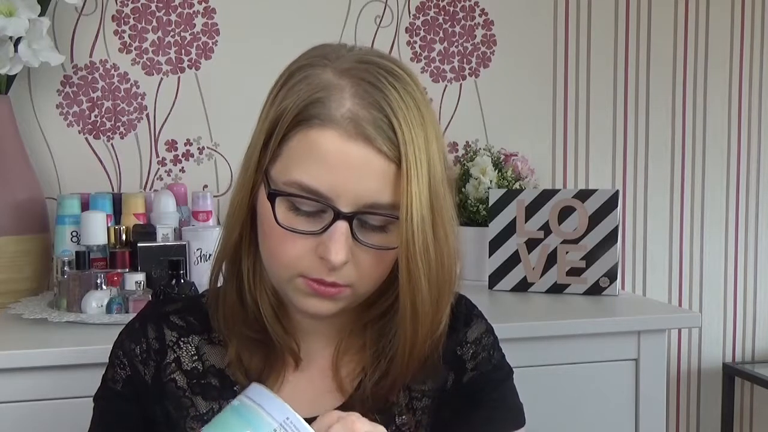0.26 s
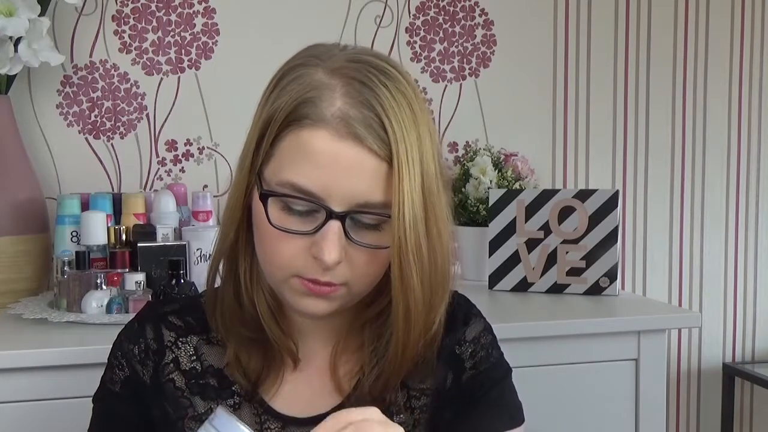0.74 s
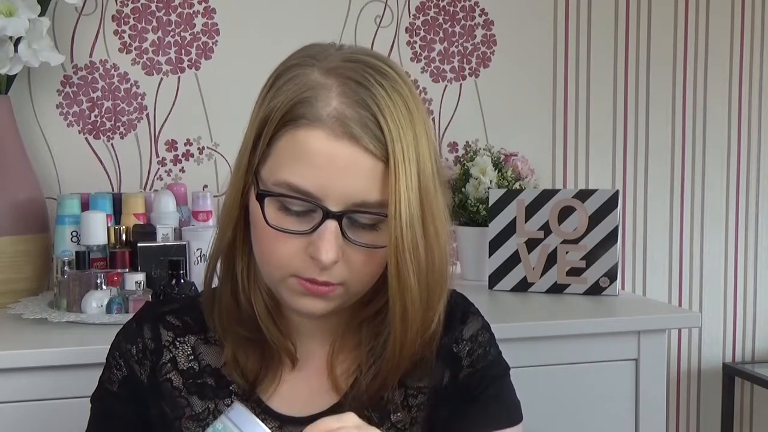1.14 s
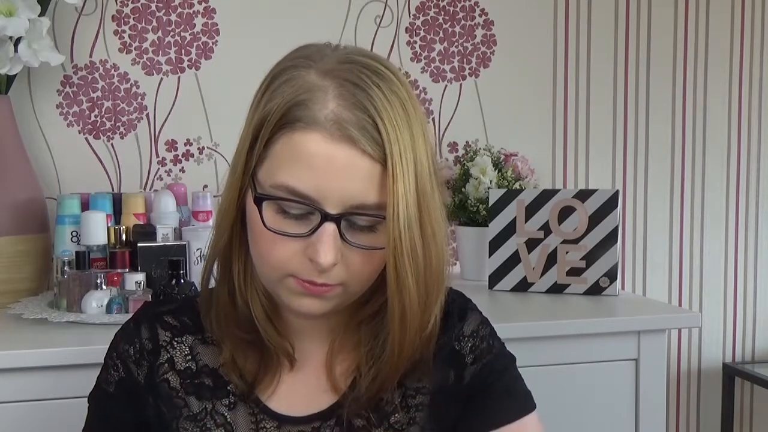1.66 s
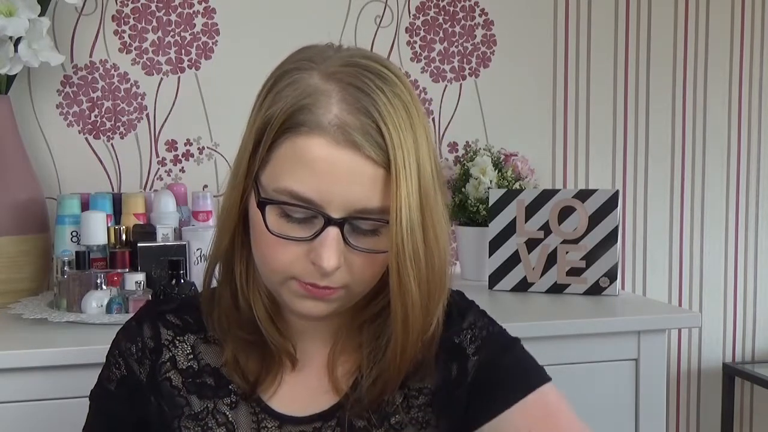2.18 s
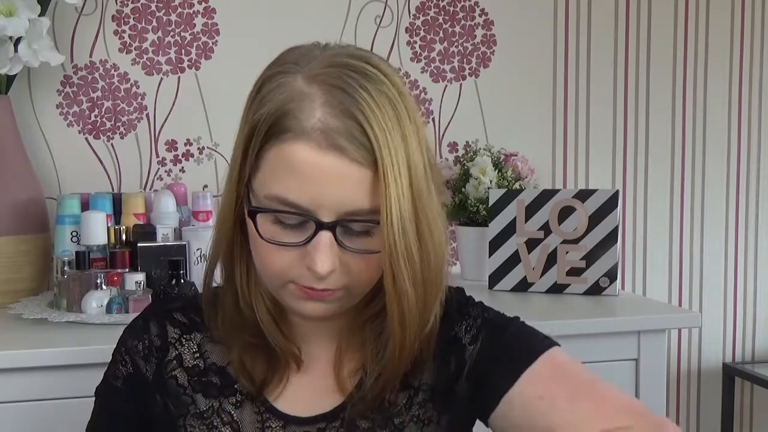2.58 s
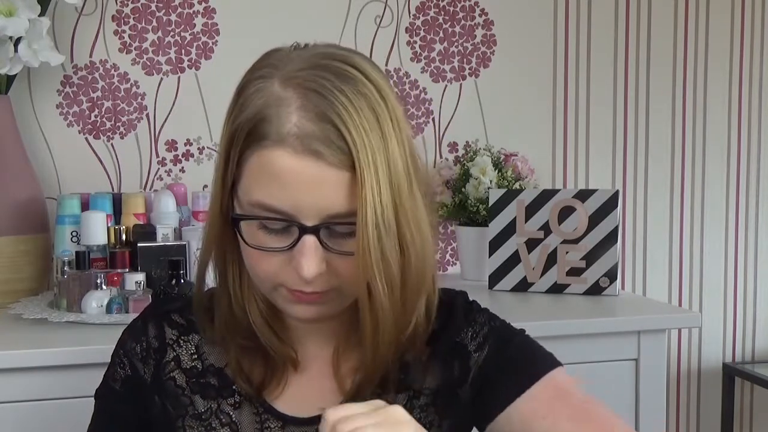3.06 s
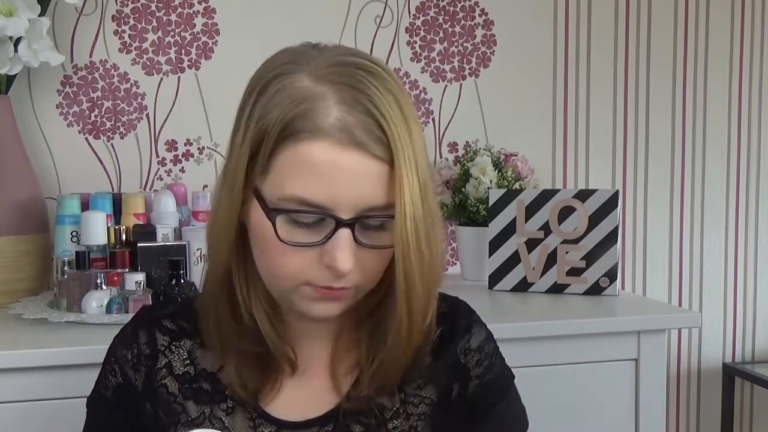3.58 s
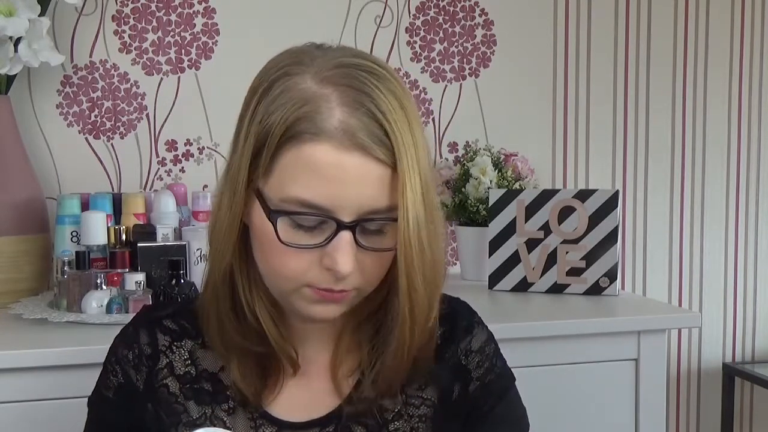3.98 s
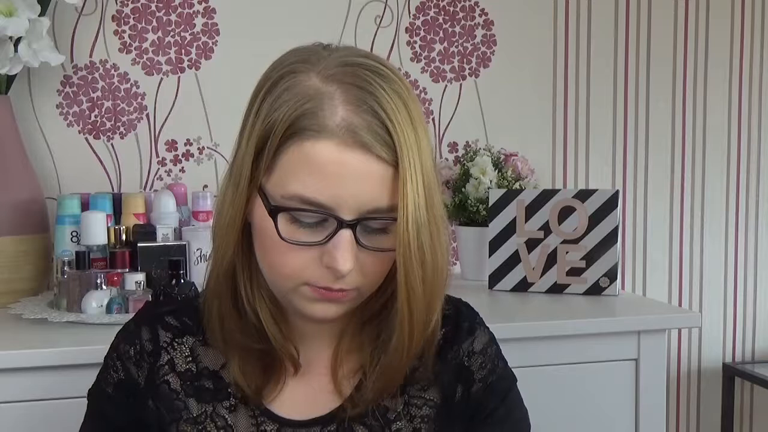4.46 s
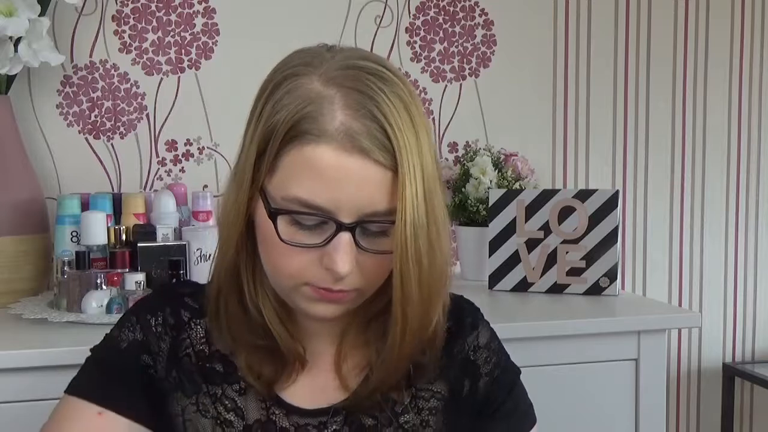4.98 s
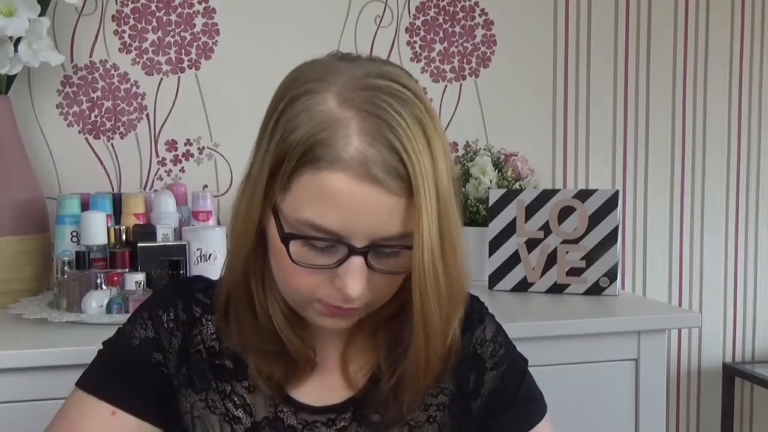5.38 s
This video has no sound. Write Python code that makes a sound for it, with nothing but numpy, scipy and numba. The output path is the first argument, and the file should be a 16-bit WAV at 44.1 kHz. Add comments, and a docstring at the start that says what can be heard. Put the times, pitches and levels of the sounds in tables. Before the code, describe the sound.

Someone opens a cardboard snack tube with a metal base, close by in a small, quiet room. The lid clicks and pops off hollowly, then handling gives several sharp knocks. The foil seal buckles with loud snaps and rips back in short, drumming pulls. A brief lull leads to lighter crinkling, fingers sliding over foil and cardboard, and a few more snaps and knocks, all with a short room reverberation.

```python
"""A snack can, a cardboard tube with a metal base, is opened close by in a small furnished room.
The lid comes off with a hollow pop; the foil seal buckles in sharp snaps and tears from the rim by
stick-slip, drumming like a membrane. Sliding fingers rustle and hiss on foil and cardboard, and knocks
set the lid or base ringing. The resonances of the tube colour the sound, and the room reverberates."""
import sys
import numpy as np
from scipy import signal
from scipy.fft import rfft, irfft, next_fast_len
from scipy.io import wavfile
from scipy.ndimage import uniform_filter1d
from numba import njit

SR = 44100
rng = np.random.default_rng(int(sys.argv[2]) if len(sys.argv) > 2 else 0)


def waveform_to_disk(signal):
    """Save audio, clipped to [-1, 1], as 16-bit WAV at the path in sys.argv[1]."""
    frames = np.transpose(np.atleast_2d(signal))
    scaled = np.clip(frames, -1, 1) * 32767
    samples = np.round(scaled).astype(np.int16)
    wavfile.write(sys.argv[1], SR, samples)


N = 248283
T = np.arange(N) / SR

# The dying tail of a knock at the very start, then finger strokes on foil and cardboard:
# start_s, length_s, rustle_db, hiss_db
RUSTLES = [(0, 0.0037, -28.5, -31), (0.047, 0.11, -68, -60), (0.3, 0.09, -56, -49), (0.525, 0.14, -52, -63),
           (1.036, 0.2, -69, -75), (1.6, 0.32, -56, -56.5), (1.905, 0.16, -58, -70),
           (2.327, 0.21, -57, -55), (2.578, 0.12, -44, -43.5), (2.87, 0.15, -46.5, -50.5),
           (3.257, 0.059, -80, -59), (3.355, 0.05, -67.5, -55), (4.224, 0.12, -70.5, -53),
           (4.318, 0.026, -53, -41.5), (4.336, 0.15, -60.5, -45), (4.478, 0.19, -65, -59.5),
           (4.813, 0.3, -49, -52.5), (5.151, 0.15, -65, -41.5), (5.301, 0.062, -70, -43),
           (5.395, 0.087, -58.5, -50.5), (5.507, 0.12, -54, -63)]
# Snaps of foil and rim: start_s, pitch_hz, note_db, crack_db, sizzle_db
FOIL_SNAPS = [(0.081, 1380, 4, -17, -15), (0.308, 750, 7, -3, -4.5), (0.338, 1830, 7, -1.5, -5.5),
              (0.385, 816, 12, 1.5, -1.5), (0.397, 480, 5, -4, -9), (0.407, 463, 19, 3, 2),
              (1.226, 923, -10, -28, -33), (1.446, 543, -7, -17.5, -25), (1.595, 1490, 5, -7, -4),
              (1.602, 540, 12, 0, -11), (1.833, 3170, -2, -9, -2.5), (1.908, 415, 18.5, -8, -38),
              (2.521, 920, 6, -6, -9), (2.532, 1550, 14, 0.5, -10), (2.6235, 1320, 15.5, 4, 2),
              (2.709, 2200, 17, 9, -6), (2.764, 770, 17, -11, -3), (4.233, 484, -11, -20.5, -17),
              (4.357, 484, -5, -16, -28), (4.497, 3140, 0, -8, -8), (4.518, 3440, -2, -4, -15),
              (4.557, 3450, -3, -7, -17), (4.6095, 2086, -1, -3, -20.5), (4.838, 3300, -2, -3, -6),
              (4.898, 1010, 14, 2, -21), (4.973, 1820, 9.5, -2, -20), (5.067, 1200, 0, -3, -10),
              (5.133, 2500, 11, -1, -11), (5.454, 1370, 2.5, -10, -25), (5.507, 1760, 18, -5, -21),
              (5.52, 1010, 16, -3, -28), (5.565, 1800, 8, -19, -34), (5.591, 1800, 6, -13, -26)]
# Tugs that pull lid or seal off the rim: start_s, length_s, pull_db, drum_db, sizzle_db, drum_hz
TUGS = [(.404, 0.069, -21.5, 3, -14, 481), (.478, 0.038, -30, -2, -12, 480),
        (0.523, 0.018, -32, 1, -13, 500), (2.764, 0.031, -20, -5.5, -3, 750),
        (2.795, 0.081, -24.5, 2.5, 2, 540), (2.88, 0.025, -28, 2, -9, 574),
        (3.003, 0.059, -46, 5, -4.5, 550), (4.396, 0.028, -57.5, 13.5, 3, 1900),
        (4.449, 0.04, -55, 8.5, 2.5, 3370), (4.893, 0.024, -34, 2, -16, 600),
        (4.934, 0.055, -35, -4.5, -11, 660)]
# Knocks on lid or base: start_s, pitch_hz, note_db, crack_db, sizzle_db, ring_db, overtone_hz, overtone_db
PLATE_KNOCKS = [(1.582, 930, 18.5, 5, -2, 15, 3455, 16.5), (1.684, 707, 11.5, -9, -16, 19, 1970, 1),
                (1.7127, 3070, 7, 0.5, 1, 16.5, 2330, 8), (1.75, 610, 20, 4, -0.5, 22, 2500, 18),
                (1.759, 723, 12.5, 0, -17, 24, 3400, 10), (1.916, 438, 22, 4.5, -0.5, 21, 2120, 18),
                (2.427, 1336, 19, -2.5, -13.5, 8, 2090, 14.5), (2.591, 760, 11, -11, -22, 23.5, 1370, 10),
                (2.597, 1604, 22.5, 11.5, 4, 23, 2400, 19), (2.665, 2180, 15, 11.5, -1, 10, 3380, 22),
                (4.903, 3535, 16, 5.5, -4, 22, 4150, 12.5), (5.1405, 952, 12.5, 6.5, -3, 20.5, 3390, 10.5),
                (5.504, 954, 21.5, 5, -17.5, 21.5, 3060, 19)]
# Resonances of the tube, its air and its metal base: centre_hz, width_hz, level_db
CAN_MODES = [(464, 77, 4), (583, 24, 4.5), (713, 41, 1.5), (820, 53, 3.5), (908, 75, 6), (1246, 31, 7),
             (1534, 190, 7.5), (1966, 280, 8), (2650, 910, 5.5), (3290, 140, 5.5), (3500, 140, 4.5)]
# Spectra of skin friction, coarse and fine: frequency_hz, level_db
RUSTLE_SPECTRUM = [(60, -16.5), (180, -19.5), (500, -2), (1000, 4), (1900, -5.5), (3600, -4), (6000, -13.5),
                   (10000, -12), (16000, -41.5)]
HISS_SPECTRUM = [(500, -58.5), (3000, 1), (7000, 1.5), (9500, 5.5), (13500, 7.5), (16000, -4)]
# Spectra of the rasp on the rim and the sizzle of foil: frequency_hz, level_db
TEAR_SPECTRUM = [(30, -46), (120, -29.5), (210, -4.5), (340, -8), (820, -19.5), (1080, 1), (1450, 10),
                 (1730, 3), (1950, 7), (2250, -1.5), (3200, -0.5), (5000, -7), (7000, -13), (16000, -45.5)]
SIZZLE_SPECTRUM = [(500, -46), (3000, -1), (6500, -12), (9000, -0.5), (11800, 1), (13500, -3.5),
                   (16000, -20.5)]
# Spectra of the room's reflections and its steady noise: frequency_hz, level_db
ECHO_SPECTRUM = [(60, -15), (200, -2.5), (500, 1), (1500, -0.5), (3300, -0.5), (6000, 0.5), (11000, -0.5),
                 (16000, -31)]
AMBIENT_SPECTRUM = [(15, -61.5), (25, -36), (153, -8.5), (185, -3), (714, -5.5), (887, -1), (962, -11.5),
                    (1070, -4.5), (1260, -5.5), (2910, -14), (3160, -13), (16000, -16)]


def undb(db):
    """Amplitude grows tenfold for every 20 decibels."""
    return 10 ** (np.asarray(db) / 20)


def unit(x):
    """Normalisation to an rms of 1."""
    return x / np.sqrt(np.mean(x ** 2))


def gains(outline, size):
    """Interpolation of (frequency_hz, level_db) points in log frequency gives one gain per bin."""
    hz, db = np.transpose(outline)
    bin_hz = np.arange(size // 2 + 1) * SR / size
    return undb(np.interp(np.log(bin_hz + 1), np.log(hz), db))


def colour(x, outline):
    """Zero-phase filtering by a spectral outline."""
    size = next_fast_len(2 * len(x))
    return irfft(rfft(x, size) * gains(outline, size), size)[:len(x)]


def minimum_phase(gain):
    """Folding the cepstrum gives the most compact causal response with these gains."""
    cepstrum = irfft(np.log(gain + 1e-12))
    half = len(cepstrum) // 2
    cepstrum[1:half] *= 2
    cepstrum[half + 1:] = 0
    return irfft(np.exp(rfft(cepstrum)))


def convolve(x, response):
    """Convolution with an impulse response, cut to the input's length."""
    return signal.fftconvolve(x, response)[:len(x)]


def add(out, start_s, x):
    """Superposition of x on out from start_s."""
    i = max(int(start_s * SR), 0)
    out[i:i + len(x)] += x[:N - i]


@njit
def bandpass(x, hz, q):
    """Second-order resonance, as a state-variable filter."""
    y, band_state, low_state = np.empty(len(x)), 0., 0.
    g = np.tan(np.pi * hz / SR)
    for i in range(len(x)):
        band = (band_state + g * (x[i] - low_state)) / (1 + g * (g + 1 / q))
        band_state = 2 * band - band_state
        low_state += 2 * g * band
        y[i] = band / q
    return y


def impulses(n, rate_hz, scatter_db):
    """Shot noise: impulses of uneven size at random moments, as in stick-slip friction."""
    sizes = undb(scatter_db * np.minimum(rng.standard_normal(n), 2))
    return unit((rng.random(n) < rate_hz / SR) * sizes * rng.choice([-1, 1], n))


def envelope(t, length_s, attack_s, release_s):
    """An amplitude envelope: exponential rise, hold and exponential decay."""
    return (1 - np.exp(-t / attack_s)) * np.exp(-np.maximum(t - length_s, 0) / release_s)


def rustles(crease_count=330, hold_db=-70):
    """Sliding friction: after a knock's brief tail, skin rustles and hisses, and small creases buckle."""
    rubbing = np.full(N, undb(hold_db))  # the fingers never lie quite still
    gliding = np.zeros(N)
    for start_s, length_s, rustle_db, hiss_db in RUSTLES:
        shape = envelope(T[:SR], length_s, attack_s=0.016, release_s=0.0061)
        add(rubbing, start_s, shape * undb(rustle_db))
        add(gliding, start_s, shape * undb(hiss_db))
    rustle = unit(colour(impulses(N, rate_hz=5000, scatter_db=7.5), RUSTLE_SPECTRUM))
    grip_db = 1.03 * unit(uniform_filter1d(rng.standard_normal(N), size=400))  # skin catches and lets go
    hiss = unit(colour(impulses(N, rate_hz=4200, scatter_db=3.5), HISS_SPECTRUM)) * undb(grip_db)
    creases = np.zeros(N)
    for when, smallness, force in rng.random((crease_count, 3)):
        crease = buckle(1750 * 2 ** smallness, note_db=0, crack_db=-7, sizzle_db=-28.5)
        add(creases, when * N / SR, crease * undb(18 * force))
    return (rustle + unit(creases)) * rubbing + hiss * gliding


def can_resonance(x, tuning=1, size=16384):
    """Forced vibration: the can responds most strongly near its modes."""
    hz = np.arange(size // 2 + 1) * SR / size
    power = 1 + sum(undb(level_db) ** 2 / (1 + (2 * (hz - centre_hz * tuning) / width_hz) ** 2)
                    for centre_hz, width_hz, level_db in CAN_MODES)
    trend = uniform_filter1d(power, size=400)
    return convolve(x, minimum_phase(np.sqrt(power / trend)))


def gripped_can(x, detune=0.035):
    """Detuning under load: the hand's squeeze shifts the can's modes from one blow to the next."""
    return can_resonance(x, tuning=1 + detune * rng.uniform(-1, 1))


def buckle(pitch_hz, note_db, crack_db, sizzle_db, buckle_s=0.0051, crack_s=0.0025, size=4096):
    """Snap-through buckling: a patch flips over in a brief flurry, and its size sets its pitch."""
    t = T[:size]
    attack = 1 - np.exp(-t / 0.00025)
    decay = undb(2) * np.exp(-t / crack_s) + np.exp(-t / buckle_s)
    flurry = rfft(rng.standard_normal(size) * attack * decay)
    humps = np.sqrt(uniform_filter1d(abs(flurry) ** 2, size=31))  # chance peaks, divided out below
    bass_db = note_db - 13 - 7.7 * np.log2(pitch_hz / 500)  # a small patch moves little air
    bass = [(50, note_db - 44), (140, bass_db - 17), (300, bass_db)]
    note = [(pitch_hz / 1.29, note_db - 7.5), (pitch_hz, note_db), (pitch_hz * 1.14, note_db - 5)]
    crack = [(4500, crack_db), (7000, (crack_db + sizzle_db) / 2 - 4)]
    sizzle = [(10000, sizzle_db), (12500, sizzle_db - 0.5), (16000, sizzle_db - 14)]
    response = minimum_phase(gains(sorted(bass + note + crack + sizzle), size) / humps)
    return irfft(flurry * rfft(response)) * np.linspace(1, 0, size)


def foil_snaps():
    """Impulsive excitation: each snap of foil or rim sounds the modes of the can."""
    out = np.zeros(N)
    for start_s, *timbre in FOIL_SNAPS:
        add(out, start_s, gripped_can(buckle(*timbre)))
    return out


def rips(pull_sag_db_per_s=51.5, sizzle_sag_db_per_s=69.5):
    """Stick-slip peeling: quick slips rasp on the rim, sizzle, and drive the cover like a drumhead."""
    out, t = np.zeros(N), T[:SR // 4]
    for start_s, length_s, pull_db, drum_db, sizzle_db, drum_hz in TUGS:
        pull = envelope(t, length_s, attack_s=0.0013, release_s=0.0036)
        pull *= undb(pull_db - pull_sag_db_per_s * t)  # tension drops as the seal gives
        # The grip gives way in about 140 uneven jerks a second, each a dense run of slips.
        pace = np.repeat(rng.uniform(0.4, 1.6, len(t)), 128)[:len(t)]
        jerk_phase = (140 * np.cumsum(pace) / SR) % 1
        surge = 1 + 0.5 * np.exp(-jerk_phase / 0.3)
        slips = impulses(len(t), rate_hz=16000, scatter_db=2) * surge
        rasp = unit(colour(slips, TEAR_SPECTRUM))
        drum = bandpass(slips, float(drum_hz), q=0.38)
        drum = bandpass(drum, float(drum_hz), q=3.25)
        drum /= np.sqrt(uniform_filter1d(drum ** 2, size=900))  # the hand steadies the tension
        sizzle = unit(colour(slips, SIZZLE_SPECTRUM))
        sizzle *= undb(sizzle_db - sizzle_sag_db_per_s * t)  # slack foil loses its sizzle first
        add(out, start_s, (rasp + undb(drum_db) * drum + sizzle) * pull)
    return out


def ring(hz, peak_db, decay_at_1khz_s=0.006, size=4096):
    """Damped free vibration: one mode radiates near its own pitch, and higher modes die sooner."""
    t = T[:size]
    decay_s = decay_at_1khz_s * np.sqrt(1000 / hz)
    swing = np.exp(-t / decay_s) * np.sin(2 * np.pi * hz * t)
    return undb(peak_db) * 2 / (decay_s * SR) * bandpass(swing, float(hz), q=1.34)


def knocks():
    """Plate vibration: lid or base snaps, then rings in two modes set by where it is pressed."""
    out = np.zeros(N)
    for start_s, hz, note_db, crack_db, sizzle_db, ring_db, overtone_hz, overtone_db in PLATE_KNOCKS:
        snap = gripped_can(buckle(hz, note_db, crack_db, sizzle_db))
        add(out, start_s, snap + ring(hz, ring_db) + ring(overtone_hz, overtone_db))
    return out


def diffuse(x, size=1024, passes=6):
    """A diffuse field spreads its energy evenly over frequency and time."""
    for _ in range(passes):
        spectra = signal.stft(x, nperseg=size)[2]
        x = signal.istft(spectra / (abs(spectra) + 1e-12), nperseg=size)[1][:len(x)]
    return unit(x)


def reflections(t60_s=0.49, treble_t60_s=0.2, build_s=0.00092):
    """Reverberation: separate early echoes merge into a smooth tail whose treble decays first."""
    t = T[:SR * 2 // 3]
    late = diffuse(rng.standard_normal(len(t)))
    early = impulses(len(t), rate_hz=280, scatter_db=-1.0) * np.exp(-t / 0.017)
    echoes = early + late
    low = colour(echoes, [(3000, -9), (9000, -57.5)])
    tail = low * undb(-60 * t / t60_s) + (echoes - low) * undb(-60 * t / treble_t60_s)
    tail *= 1 - np.exp(-t / build_s)
    return colour(tail / np.linalg.norm(tail), ECHO_SPECTRUM)


def even(response, size=65536):
    """Spectral smoothing levels narrow humps, as a furnished room favours no single note."""
    power = abs(rfft(response, size)) ** 2
    gain = np.sqrt(uniform_filter1d(power, size=600) / uniform_filter1d(power, size=40))
    return convolve(response, minimum_phase(gain))


def room_noise():
    """Stationary random noise forms the room's background."""
    return unit(colour(rng.standard_normal(N), AMBIENT_SPECTRUM))


def scene():
    """Direct and reverberant fields add: the can lies straight ahead, the room all around."""
    source = foil_snaps() + knocks() + can_resonance(rips() + rustles())
    ahead = reflections()
    ahead[0] += 1  # the direct sound
    mid = convolve(source, even(ahead)) + undb(-59.5) * room_noise()
    side = convolve(source, even(reflections())) + undb(-53.5) * room_noise()
    side = colour(side, [(500, -11), (5500, -7.0), (8500, -15.5), (12000, -26.5)])  # a nearly mono top
    lean = colour(mid, [(50, -44), (250, -22), (2000, -35)])  # the lows lean to the left
    return np.array([mid + side + lean, mid - side - lean])


def record(dry):
    """Soft saturation rounds the highest peaks, and a steep low-pass cuts the top."""
    lowpass = signal.ellip(8, 0.2, 80, 15900, fs=SR, output="sos")
    return signal.sosfilt(lowpass, np.tanh(dry))


dry = scene()
out = record(dry)
waveform_to_disk(out)
```